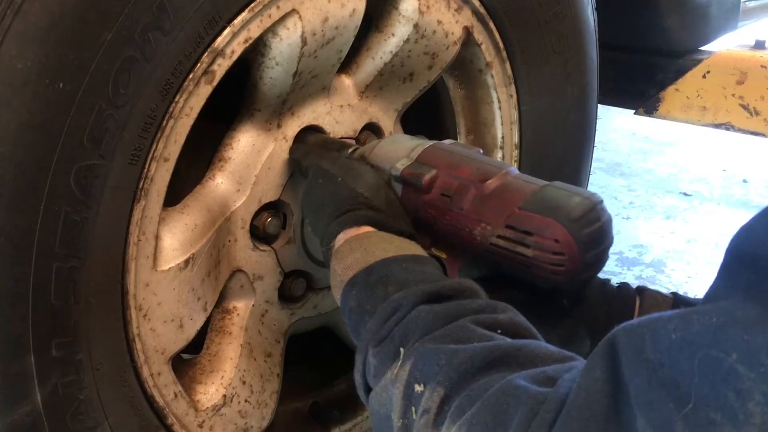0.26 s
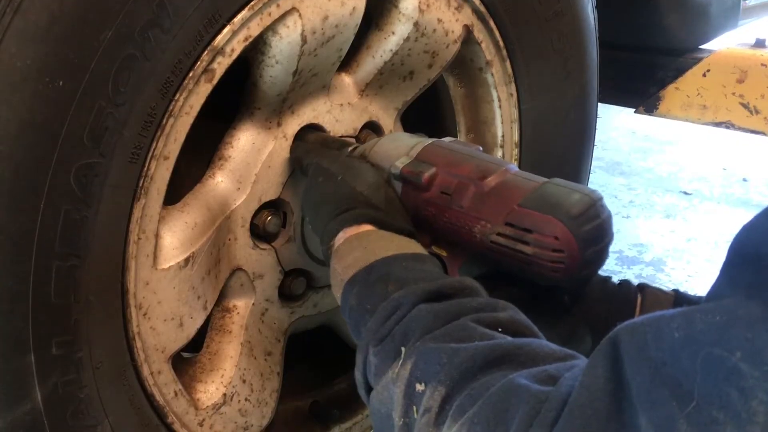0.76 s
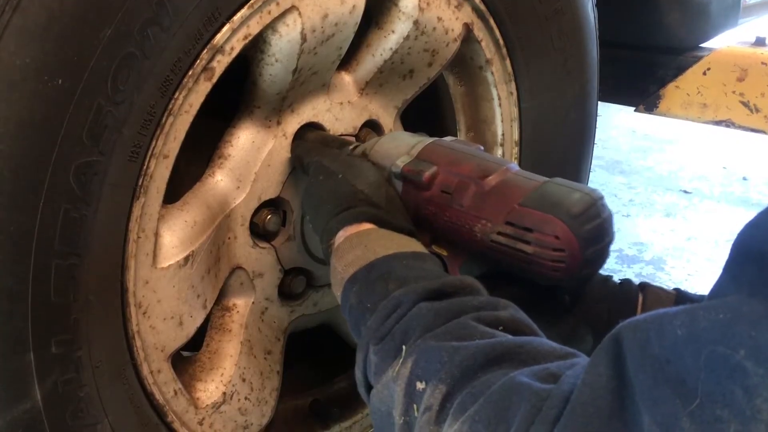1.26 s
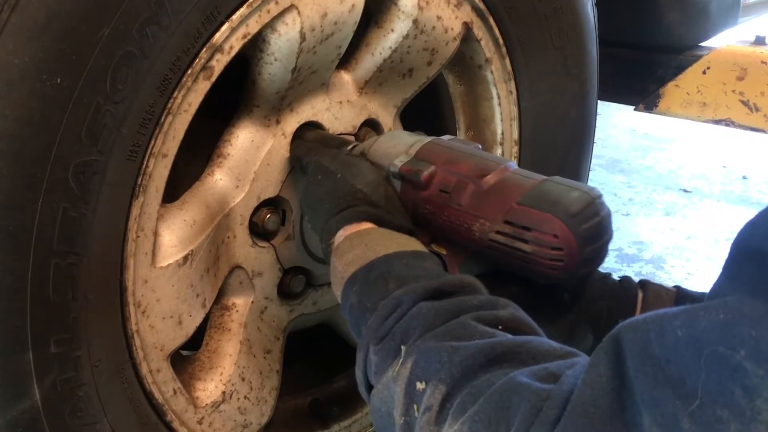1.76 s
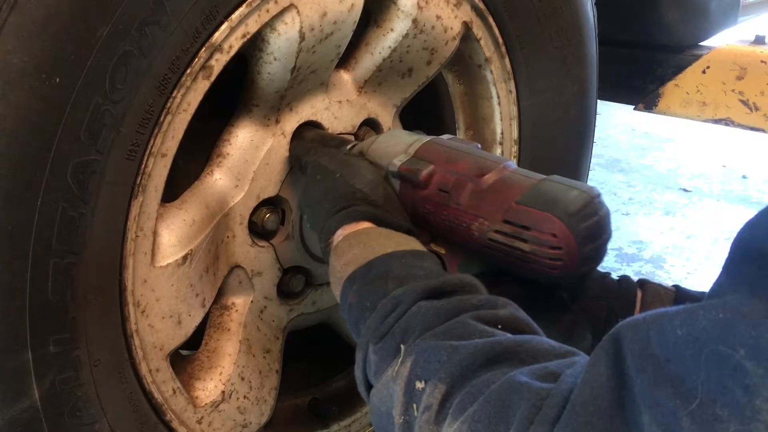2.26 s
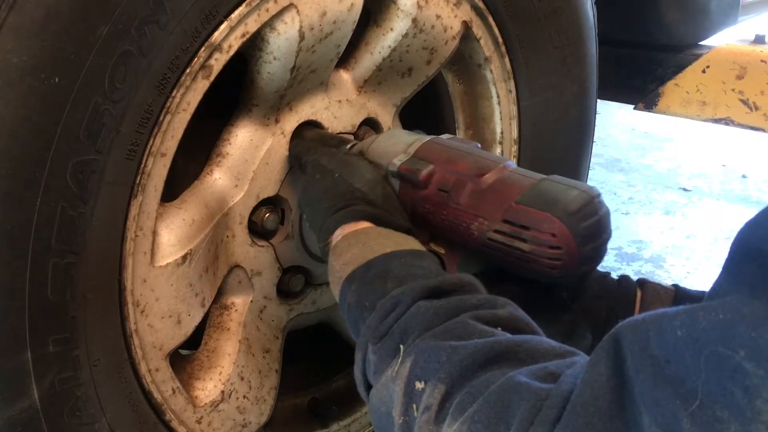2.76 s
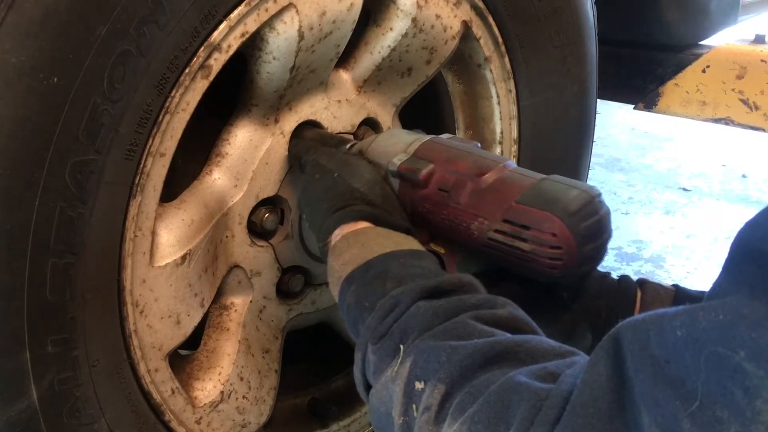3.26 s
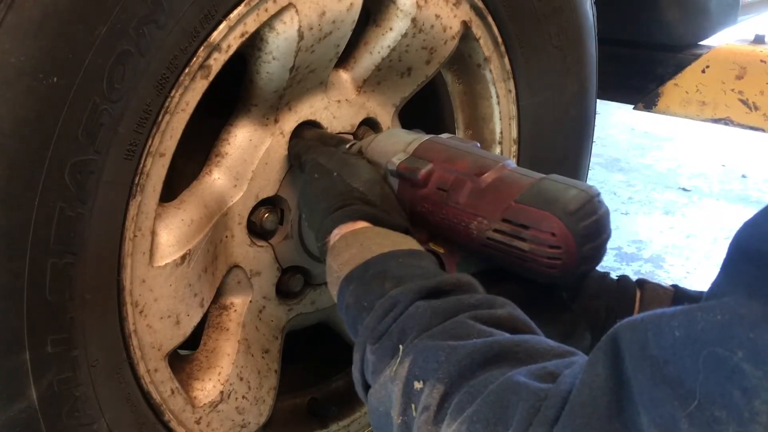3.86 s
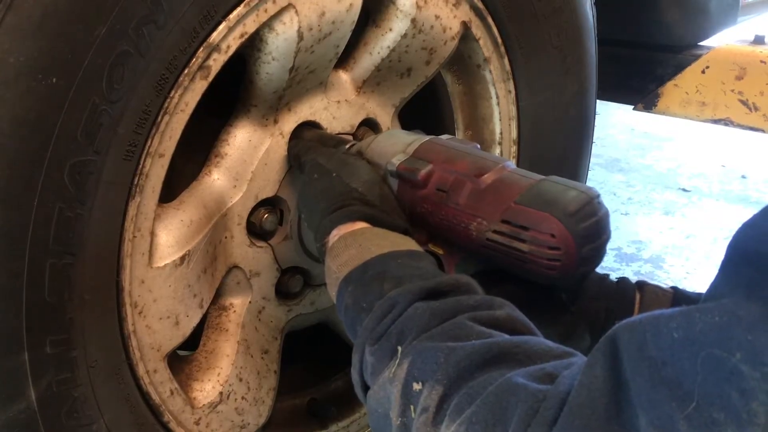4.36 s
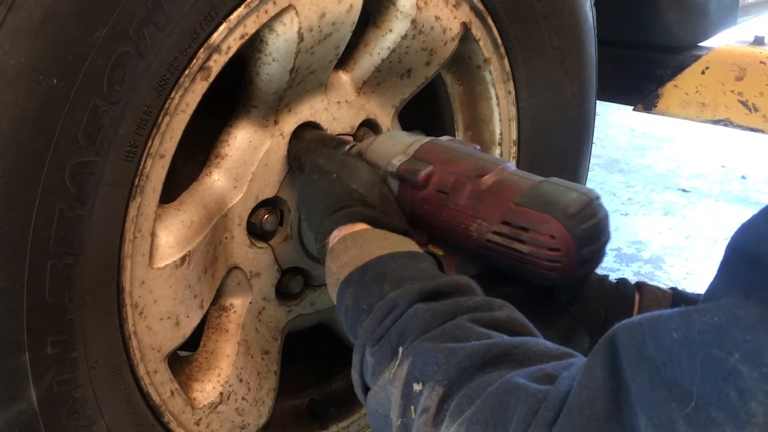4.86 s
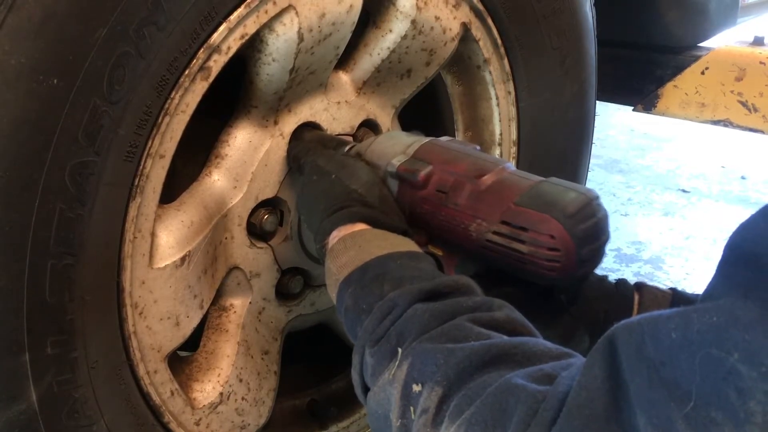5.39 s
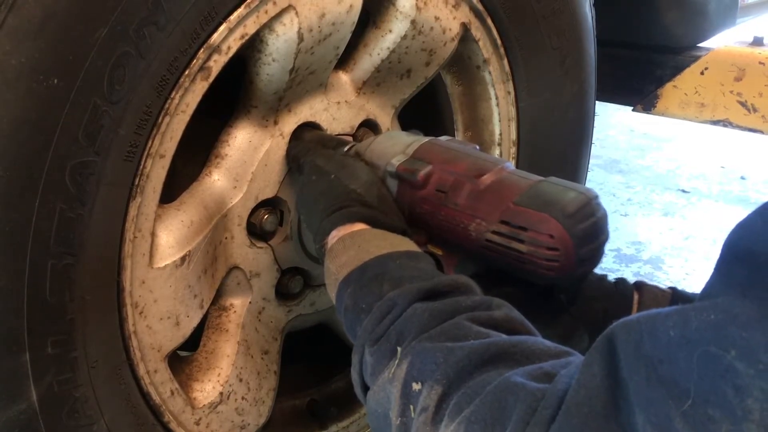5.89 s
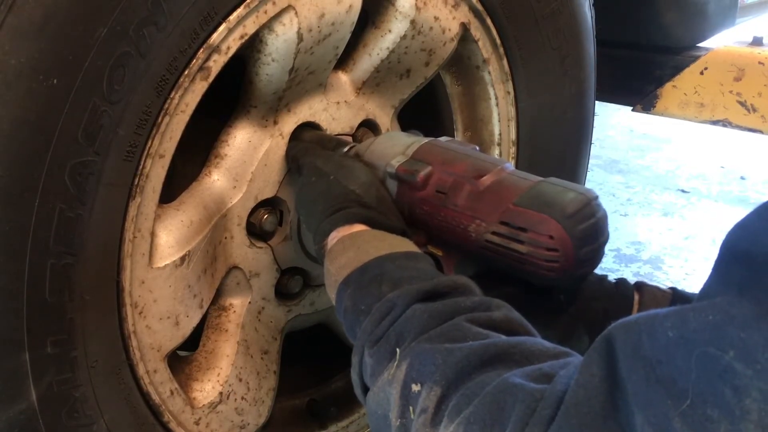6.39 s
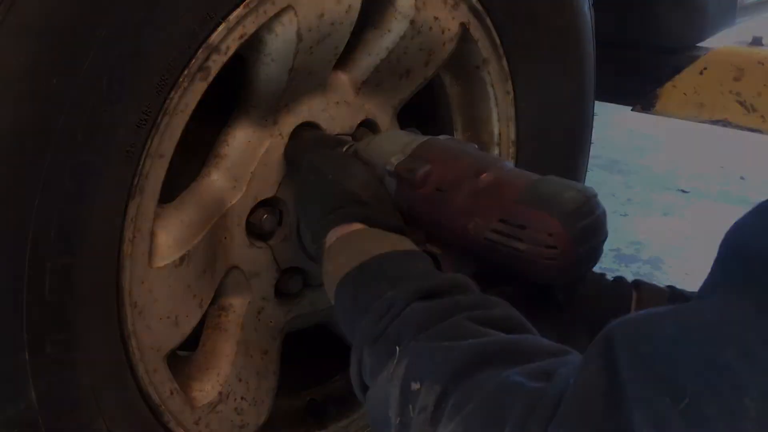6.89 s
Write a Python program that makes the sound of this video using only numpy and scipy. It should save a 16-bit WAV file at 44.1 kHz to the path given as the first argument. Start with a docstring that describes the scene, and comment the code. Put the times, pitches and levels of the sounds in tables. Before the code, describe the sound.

A cordless impact wrench hammers nonstop on a wheel nut, a loud, harsh metallic rattle very close by in a small workshop.

```python
"""Impact wrench on a stuck lug nut

A cordless impact wrench hammers without a break on an alloy car wheel, close by in a workshop.
Each blow is a noise burst, and mostly a rattle of rebounds: filters make it clank, crack and thud,
resonances make the wheel ring and the loose socket chink. The blows grow as the socket seats.
Faint whines and a low rumble, both filtered noise, lie underneath; a short room tail follows the tool.
"""
import sys
import numpy as np
from scipy import signal
from scipy.fft import rfft, irfft, next_fast_len
from scipy.io import wavfile
from scipy.ndimage import uniform_filter1d

SR = 44100
rng = np.random.default_rng(int(sys.argv[2]) if len(sys.argv) > 2 else 0)


def log_audio(samples):
    """Write samples as a 16-bit WAV file to the path given in sys.argv[1]."""
    # one column per channel
    frames = np.atleast_2d(samples).T
    # limit to full scale, then quantise
    limited = np.clip(frames, -1, 1)
    pcm = np.round(limited * 32767).astype(np.int16)
    wavfile.write(sys.argv[1], SR, pcm)


N = 314423

BLOW_RATE_HZ = 36.7


def amp(db):
    """Decibels to gain."""
    return 10 ** (np.asarray(db) / 20)


def unit(x):
    """Scale to rms 1."""
    return x / np.sqrt(np.mean(x ** 2) + 1e-20)


def noise():
    """White noise of full length."""
    return rng.standard_normal(N)


def along(points, hz):
    """(Hz, value) points interpolated on a log frequency axis."""
    f, v = np.transpose(points)
    return np.interp(np.log(hz + 1), np.log(f + 1), v)


def filtered(x, response):
    """x times a complex response of frequency."""
    size = 2 * next_fast_len((N + SR // 2) // 2)
    spectrum = rfft(x, size) * response(np.fft.rfftfreq(size, 1 / SR))
    return irfft(spectrum, size)[:N]


def coloured(x, points):
    """Minimum-phase filter of unit power with the given spectrum."""
    def response(hz):
        cepstrum = irfft(np.log(unit(amp(along(points, hz)))))
        half = len(cepstrum) // 2
        # fold the cepstrum forward in time: causal
        folded = np.r_[cepstrum[0], 2 * cepstrum[1:half], np.zeros(half)]
        return np.exp(rfft(folded))
    return filtered(x, response)


def resonate(x, modes):
    """Causal bank of resonances of unit power, alternating in sign."""
    def response(hz):
        h = 0
        for k, (centre, width, db) in enumerate(modes):
            damping = 1j * hz * width
            h = h + (-1) ** k * amp(db) * damping / (centre ** 2 - hz ** 2 + damping)
        return h / np.sqrt(np.mean(np.abs(h) ** 2))
    return filtered(x, response)


def bursts(times, db, decay_s, rise_s=.0006):
    """Contact noise at each time; db is the power of one burst spread over half a beat."""
    index = np.clip(np.round(times * SR).astype(int), 0, N).ravel()
    energy = np.bincount(index, amp(db).ravel() ** 2, N + 1)[:N] * SR / BLOW_RATE_HZ / 2
    # the faces press together over rise_s, then the contact dies away
    for keep in np.exp(-2 / SR / np.array([rise_s, decay_s])):
        energy = signal.lfilter([1 - keep], [1, -keep], energy)
    return np.sqrt(energy) * noise()


def rattle(times, db, decay_s, rebound_db, span_s, scatter_db, count=6):
    """Each blow is one hard contact, then rebounds that fade by 10 dB over span_s."""
    place = (np.arange(count) + .5 + rng.random((len(times), count))) / count
    scatter = scatter_db * rng.standard_normal(place.shape)
    rebounds_db = db[:, None] + rebound_db - 10 * place + scatter
    contacts = np.c_[times, times[:, None] + span_s * place]
    return bursts(contacts, np.c_[db, rebounds_db], decay_s)


def on_blows(times, events, usual):
    """One value per blow: the usual one, or that of an event which falls on the blow."""
    s, value = np.transpose(events)
    gap = np.abs(times[:, None] - s)
    return np.where(gap.min(axis=1) < .5 / BLOW_RATE_HZ, value[gap.argmin(axis=1)], usual)


def uneven(count, recovery):
    """Chance from blow to blow, rms 1: a strong blow tends to be followed by a weak one."""
    draw = rng.standard_normal(count + 1)
    return unit(draw[1:] - recovery * draw[:-1])


SEAT_S = 0.78  # the socket starts to seat firmly on the nut


def bite(times, loose_db, seated_db, seating_s):
    """Level of a part (dB): low while the socket is loose, rising as it seats, then steady."""
    seated = np.clip((times - SEAT_S) / seating_s, 0, 1)
    return loose_db + (seated_db - loose_db) * seated


# background rumble: (frequency [Hz], relative level [dB])
RUMBLE_SPECTRUM = [(15, -22), (25, -9), (33, -4.5), (44, 0), (58, -5), (75, -4), (100, -10), (140, -21),
                   (300, -32), (1000, -60)]


def rumble():
    """Steady low-frequency noise."""
    return amp(-51.0) * unit(coloured(noise(), RUMBLE_SPECTRUM))


# motor and gear tones: (frequency [Hz], level [dB])
WHINES = [(749, -52), (8330, -51.5)]
# growth of thud and motor load: (loose level [dB], seated level [dB], seating time [s])
THUD_BITE = (-46, -37.5, 1.37)
# the whines stand out as the motor takes up the full load
STRAIN_S, STRAIN_SPAN_S, STRAIN_DB = 2, 1.1, 6


def whine(centre_hz):
    """Thin, slightly unsteady tone: noise through a narrow Gaussian band."""
    width_hz = 6 + centre_hz / 1000
    return unit(filtered(noise(), lambda hz: np.exp(-((hz - centre_hz) / width_hz) ** 2)))


def motor():
    """Motor and gear whines that grow with the load."""
    t = np.arange(N) / SR
    strain_db = STRAIN_DB * np.exp(-((t - STRAIN_S) / STRAIN_SPAN_S) ** 2)
    load = unit(amp(.5 * bite(t, *THUD_BITE) + strain_db))
    return load * sum(amp(db) * whine(centre_hz) for centre_hz, db in WHINES)


# motor speed drift: (time [s], delay behind a steady beat [s])
DRIFT = [(0, 0.013), (0.45, 0.016), (1.1, 0.023), (1.4, 0.0225), (1.95, 0.017), (3.3, 0.02), (3.8, 0.021),
         (4.5, 0.025), (5.1, 0.023), (5.55, 0.02), (5.9, 0.023), (6.2, 0.02), (6.55, 0.018), (7.13, 0.0091)]
# hardest blows, landing square: (time [s], peak level [dB])
SQUARE_BLOWS = [(0.4243, -6), (1.0311, -6.5), (1.0869, -3), (1.5735, -2), (1.6283, -7), (1.925, -4),
                (2.2262, -5), (2.7144, -4.5), (3.017, -5), (3.045, -3.5), (3.1258, -3.5), (3.6177, -4.5),
                (4.4928, -2), (5.9078, -2), (6.7186, -2), (6.8506, -6), (6.9338, -3)]
# growth of the clank: (loose level [dB], seated level [dB], seating time [s])
CLANK_BITE = (-19.5, -16, 1.5)
SQUARE_CREST_DB = 11.5  # peak above mean level
FORCE_SCATTER_DB = 1.17
LUG_DB = 0.4  # the anvil's two lugs take turns, one a little harder
GLANCE_SHARE, GLANCE_DB = .06, -2  # share of blows that only glance, and their loss
ROCK_HZ, ROCK_DB, ROCK_PEAK_S = 2.8, 0.4, 0.15  # swell as the tool rocks in the hand


def hammer():
    """Time (s) and relative strength (dB) of every blow: drifting beat, alternating lugs, chance."""
    number = np.arange(round(N / SR * BLOW_RATE_HZ))
    beat = number / BLOW_RATE_HZ
    jitter = .0004 * rng.standard_normal(len(beat))
    times = beat + np.interp(beat, *np.transpose(DRIFT)) + jitter
    times = on_blows(times, [(s, s) for s, db in SQUARE_BLOWS], times)
    lug = LUG_DB * (-1) ** number
    rock = ROCK_DB * np.cos(2 * np.pi * ROCK_HZ * (times - ROCK_PEAK_S))
    scatter = FORCE_SCATTER_DB * rng.standard_normal(len(times))
    glance = GLANCE_DB * (rng.random(len(times)) < GLANCE_SHARE)
    square = [(s, db - SQUARE_CREST_DB - bite(s, *CLANK_BITE)) for s, db in SQUARE_BLOWS]
    return times, on_blows(times, square, lug + rock + scatter + glance)


FACE_SCATTER_DB, FACE_RECOVERY = 1.85, 0.44  # crack spread; how much a sharp one dulls the next
FACE_LUG_DB = 0.5  # the crack tells the two lugs apart most clearly


def face_level(crack_db, force_db):
    """Crack level (dB): the steel faces meet at a slightly different angle every time."""
    count = len(force_db)
    lug = FACE_LUG_DB * (-1) ** np.arange(count)
    return crack_db + .5 * force_db + lug + FACE_SCATTER_DB * uneven(count, FACE_RECOVERY)


# steel faces, also colours crack and scrape: (frequency [Hz], relative level [dB])
CRACK_SPECTRUM = [(4000, -35.5), (5450, -18.5), (5900, -5.5), (6400, -8.5), (7400, -4), (7950, -5.5),
                  (9300, -10), (9950, -12.5), (10500, -48), (11500, -11.5), (13300, -6), (15000, -7.5),
                  (15800, -56)]


def whir(times, face_db):
    """Continuous noise between the blows, following the crack level."""
    level_db = np.interp(np.arange(N) / SR, times, face_db) - 9.0
    return amp(level_db) * coloured(noise(), CRACK_SPECTRUM)


# hammer case, also colours the scrape: (frequency [Hz], relative level [dB])
CLANK_SPECTRUM = [(1470, -41), (2150, -17), (2230, -23), (2600, -7), (3350, -1), (3970, -5.5),
                  (4080, -11.5), (4403, -5.5), (4746, -18.5), (6700, -44.5)]
# (contact decay [s], first rebound [dB], rebound span [s], rebound scatter [dB])
CASE_RATTLE = (.003, -2.5, .02, 2.5)


def case_clank(times, clank_db, force_db):
    """The hammer case clanks at each contact and rebound."""
    return coloured(rattle(times, clank_db + force_db - 5.0, *CASE_RATTLE), CLANK_SPECTRUM)


# wheel disc: (frequency [Hz], relative level [dB])
BARK_SPECTRUM = [(500, -37.5), (900, -15.5), (1020, -15), (1130, -8.5), (1280, -14), (1680, -6),
                 (3200, -28.5)]
# (contact decay [s], first rebound [dB], rebound span [s], rebound scatter [dB])
DISC_RATTLE = (.0033, -6.5, .024, 2.2)


def disc_bark(times, clank_db, force_db):
    """The wheel disc barks briefly, almost regardless of the force."""
    return coloured(rattle(times, clank_db + 0.11 * force_db - 12, *DISC_RATTLE), BARK_SPECTRUM)


# lasting modes of wheel and tool: (frequency [Hz], width [Hz], relative level [dB])
WHEEL_MODES = [(1044, 30, -17), (1795, 25, -12), (2408, 22, -6), (2774, 34, -4), (2989, 32, -1),
               (3130, 50, -6), (3354, 50, -3.5), (3630, 40, -8), (3854, 32, -2), (4196, 45, -6),
               (4310, 45, -10), (5000, 70, -22), (5817, 70, -19), (6910, 80, -21), (7413, 65, -13),
               (7674, 65, -18)]


def wheel_ring(times, clank_db, force_db):
    """Narrow modes of wheel and tool ring on after each contact."""
    return resonate(bursts(times, clank_db + force_db - 3.5, decay_s=0.01), WHEEL_MODES)


# (contact decay [s], first rebound [dB], rebound span [s], rebound scatter [dB])
FACE_RATTLE = (.0046, -5, .013, 3)


def face_crack(times, face_db):
    """The steel faces crack and rebound."""
    return coloured(rattle(times, face_db - .7, *FACE_RATTLE), CRACK_SPECTRUM)


# loudest chinks of the socket on the nut: (time [s], peak level [dB])
CHINKS = [(1.3029, -14), (1.4371, -10.5), (1.8706, -9.5), (2.145, -12), (3.4815, -10.5), (4.1101, -11.5),
          (5.0115, -9), (5.5533, -11.5), (5.8267, -13), (6.0721, -12), (6.4218, -14), (6.6383, -10)]
CHINK_CREST_DB = 12.5  # peak above mean level
CHINK_DB, CHINK_SCATTER_DB = -0.53, 5  # usual chink against the crack, and its swing either way
CHATTER_S, CHATTER_SPAN_S, CHATTER_DB = 1.9, 0.66, 2.5  # more chatter while the socket settles


def chink_level(times, crack_db):
    """Socket chink (dB) at every blow: left to chance, livelier while the socket settles."""
    chatter_db = CHATTER_DB * np.exp(-((times - CHATTER_S) / CHATTER_SPAN_S) ** 2)
    swing_db = CHINK_SCATTER_DB * np.tanh(uneven(len(times), FACE_RECOVERY))
    usual_db = crack_db + CHINK_DB + chatter_db + swing_db
    return on_blows(times, [(s, db - CHINK_CREST_DB) for s, db in CHINKS], usual_db)


# socket: (frequency [Hz], width [Hz], relative level [dB])
SOCKET_MODES = [(8680, 300, -9), (8990, 220, -2), (9230, 170, 0), (9420, 200, -3), (9680, 180, -9)]
# (contact decay [s], first rebound [dB], rebound span [s], rebound scatter [dB])
SOCKET_RATTLE = (.004, -5.5, .022, 2.5)


def socket_chink(times, crack_db):
    """The loose socket rattles on the nut and rings in its high modes."""
    return resonate(rattle(times, chink_level(times, crack_db), *SOCKET_RATTLE), SOCKET_MODES)


# hammer spring: (frequency [Hz], width [Hz], relative level [dB])
SPRING_MODES = [(1042, 88, 2.5), (1146, 43, -0.5)]


def spring_recoil(times, clank_db):
    """The hammer recoils against its spring and is thrown forward again."""
    moments = times[:, None] + [.002, .0105]
    return resonate(bursts(moments, clank_db[:, None] + [-23, -20.5], decay_s=0.0043), SPRING_MODES)


# wheel and tyre: (frequency [Hz], relative level [dB])
THUD_SPECTRUM = [(100, -48), (170, -19.5), (240, -7.5), (310, 1.5), (400, 1), (480, -1.5), (620, 1),
                 (820, -5.5), (1300, -34.5)]


def wheel_thud(times, thud_db):
    """The heavy wheel and tyre answer a moment after the contact."""
    level_db = thud_db + 1.92 * rng.standard_normal(len(times)) + .5
    return coloured(bursts(times + 0.0023, level_db, decay_s=0.01), THUD_SPECTRUM)


def lug_scrape(times, crack_db):
    """The hammer scrapes over the anvil's lugs before the next blow, now lightly, now hard."""
    level_db = crack_db - 7.5 + 4.5 * rng.standard_normal(len(times))
    drag = bursts(times + .017, level_db, decay_s=.02)
    return coloured(drag, CRACK_SPECTRUM) + amp(5.5) * coloured(drag, CLANK_SPECTRUM)


# growth of the crack: (loose level [dB], seated level [dB], seating time [s])
CRACK_BITE = (-36, -31, .45)


def wrench():
    """The blows drive the hammer case, the wheel, the steel faces, the socket and the spring."""
    times, force_db = hammer()
    clank_db = bite(times, *CLANK_BITE)
    crack_db = bite(times, *CRACK_BITE)
    thud_db = bite(times, *THUD_BITE)
    face_db = face_level(crack_db, force_db)
    case = case_clank(times, clank_db, force_db)
    wheel = disc_bark(times, clank_db, force_db) + wheel_ring(times, clank_db, force_db)
    wheel += wheel_thud(times, thud_db)
    steel = whir(times, face_db) + face_crack(times, face_db) + lug_scrape(times, crack_db)
    return case + wheel + steel + socket_chink(times, crack_db) + spring_recoil(times, clank_db)


# room decay: (frequency [Hz], time to fall 60 dB [s])
WORKSHOP_T60 = [(200, 0.2), (1000, 1), (4000, 0.22), (14000, 0.09)]


def workshop(x, count=24):
    """Room echo: a fresh random decaying tail for each short stretch keeps its colour even."""
    wet = np.zeros(N + SR)
    delay = round(.006 * SR)
    for part in np.array_split(np.arange(N), count):
        hz, t, z = signal.stft(rng.standard_normal(SR // 2), SR, nperseg=256)
        decay = amp(-60 * t / along(WORKSHOP_T60, hz)[:, None])
        tail = signal.istft(z * decay, SR, nperseg=256)[1]
        echo = signal.fftconvolve(x[part], tail / np.linalg.norm(tail))
        wet[part[0] + delay:][:len(echo)] += echo
    return wet[:N]


# patchy fading of narrow bands: (frequency [Hz], depth [dB])
FADING_DEPTH = [(900, .5), (2000, 3), (3300, 2.3), (5500, 4), (7400, 3.6), (8400, 1.2), (13000, 2.8)]


def patchy_fading(x, size=2048):
    """Patchy fading of narrow bands, as from a phone's noise suppression."""
    hz, t, z = signal.stft(x, SR, nperseg=size)
    patch = np.outer(np.hanning(11), np.hanning(7))  # about 100 Hz by 70 ms
    field = signal.fftconvolve(rng.standard_normal(z.shape), patch, 'same')
    # one band gains what its neighbours lose
    field = unit(field - uniform_filter1d(field, size=31, axis=0))
    # dips run deeper than swells
    gain = amp(along(FADING_DEPTH, hz)[:, None] * (field - field ** 2 / 8))
    gain /= np.sqrt(np.mean(gain ** 2, axis=1, keepdims=True))
    return signal.istft(z * gain, SR, nperseg=size)[1][:N]


def scene():
    """Wrench and room pass through the patchy fading together; motor whine and rumble are added."""
    tool = wrench()
    faded = patchy_fading(tool + amp(-10.0) * workshop(tool))
    return (faded + motor() + rumble())[None]


TOP_HZ = 15750


def record(dry):
    """Round off the highest peaks, then remove everything from TOP_HZ up."""
    soft = dry[0] / (1 + np.abs(dry[0]) ** 6) ** (1 / 6)
    return filtered(soft, lambda hz: hz < TOP_HZ)[None]


dry = scene()
out = record(dry)
log_audio(out)
```